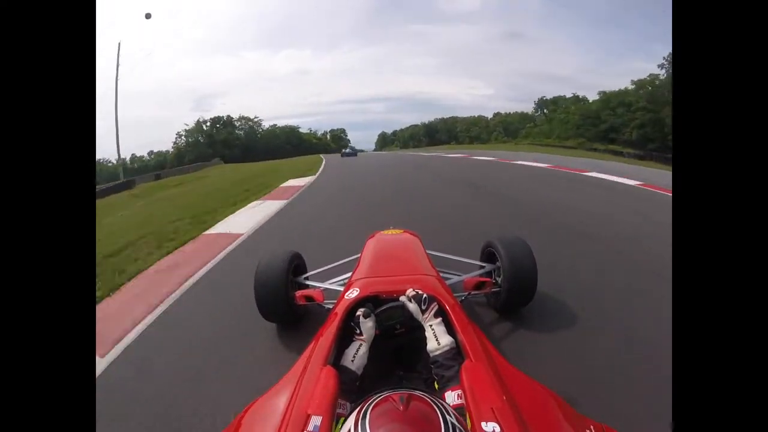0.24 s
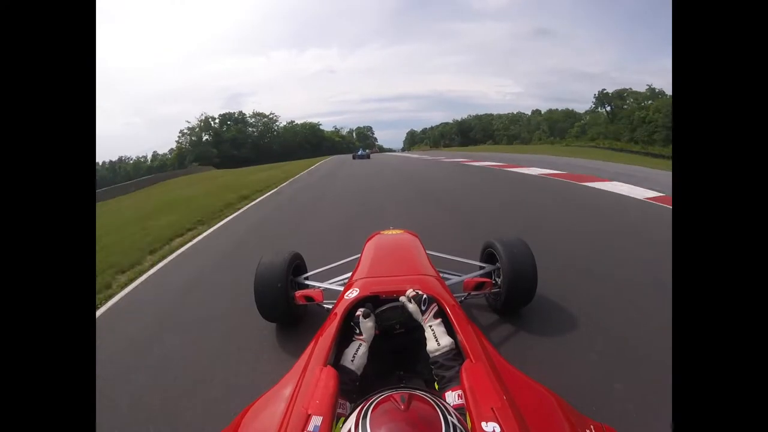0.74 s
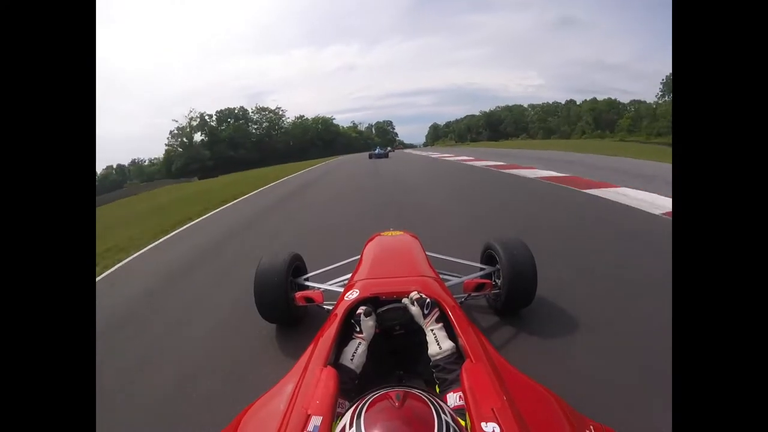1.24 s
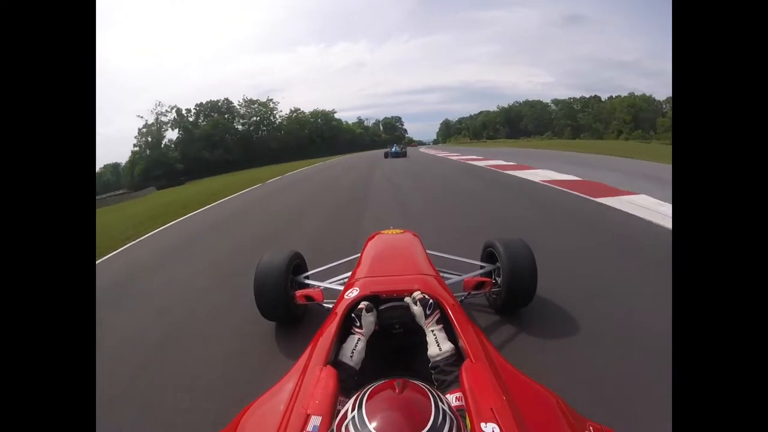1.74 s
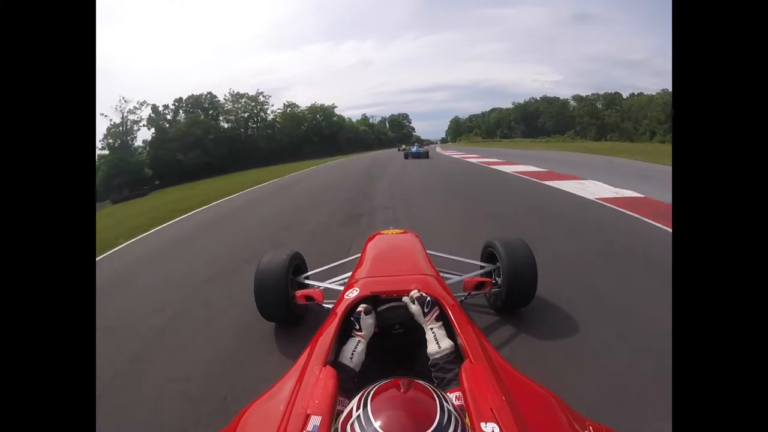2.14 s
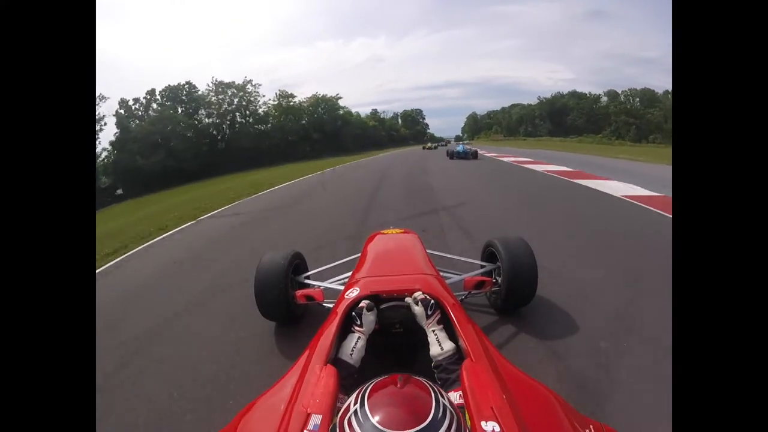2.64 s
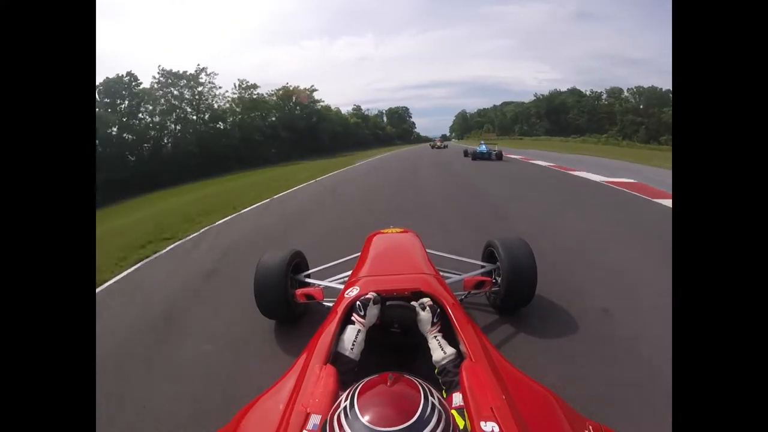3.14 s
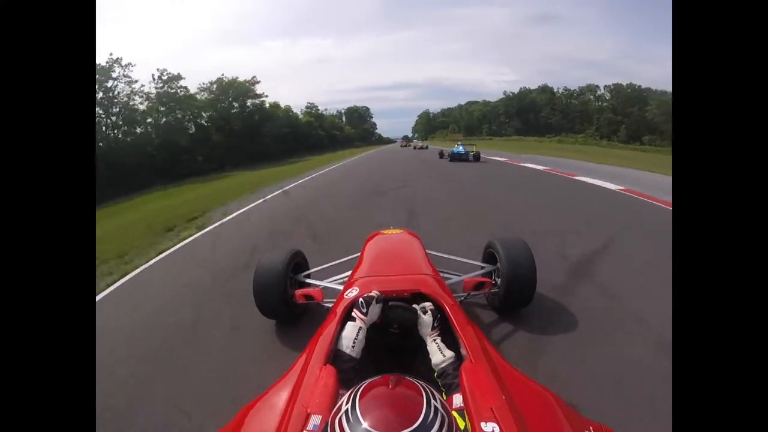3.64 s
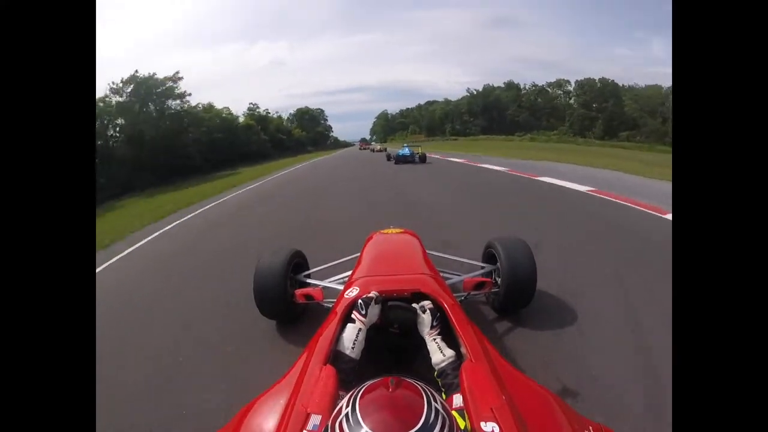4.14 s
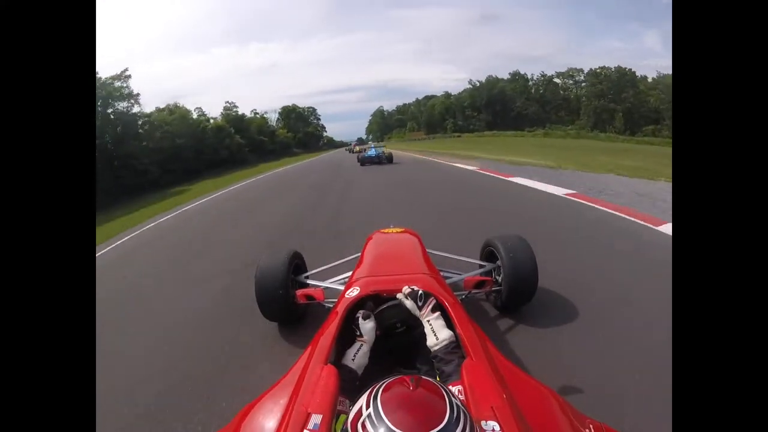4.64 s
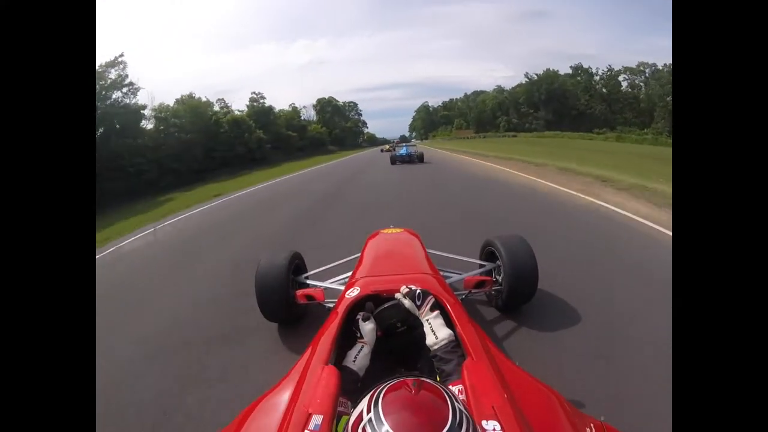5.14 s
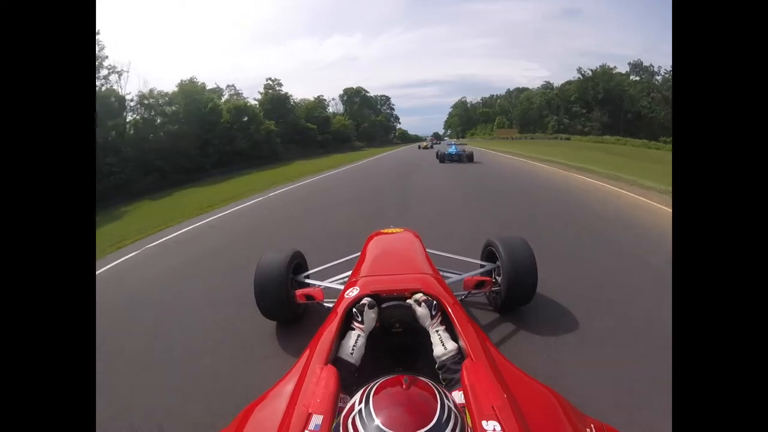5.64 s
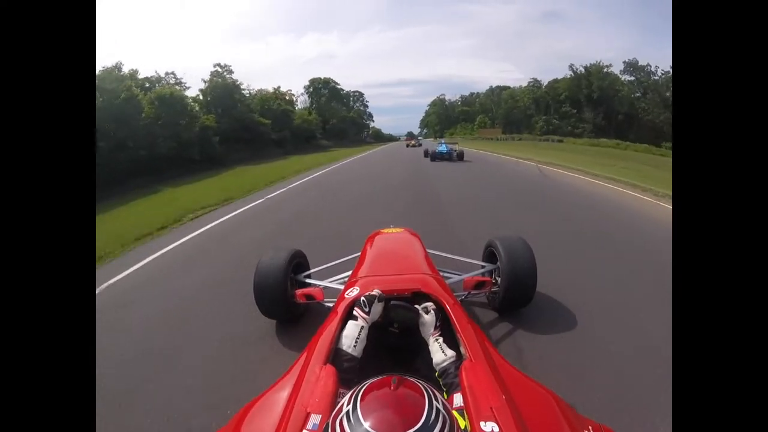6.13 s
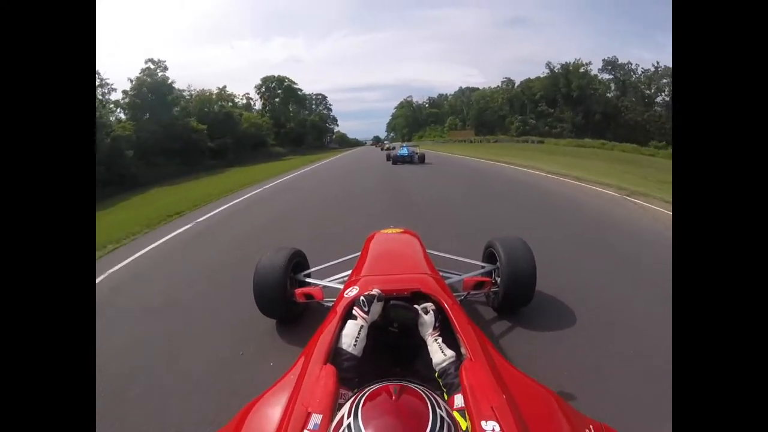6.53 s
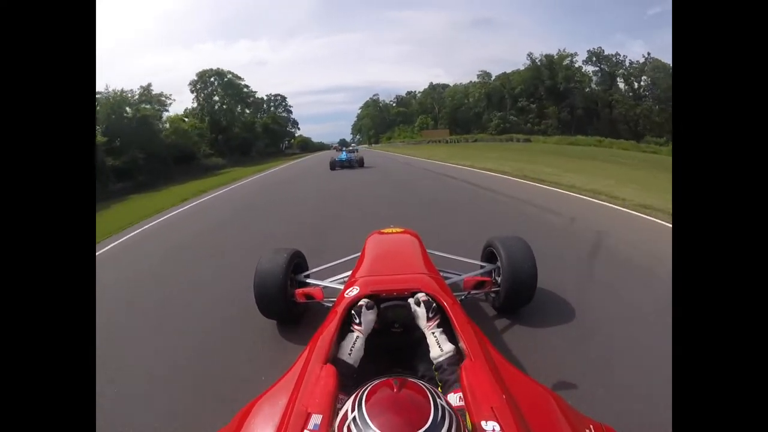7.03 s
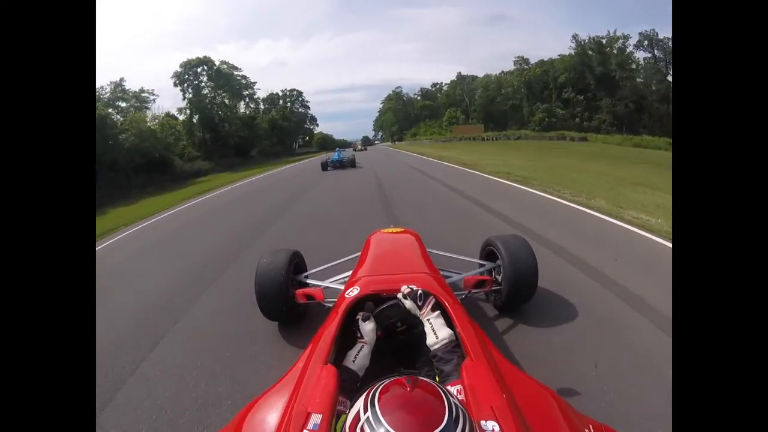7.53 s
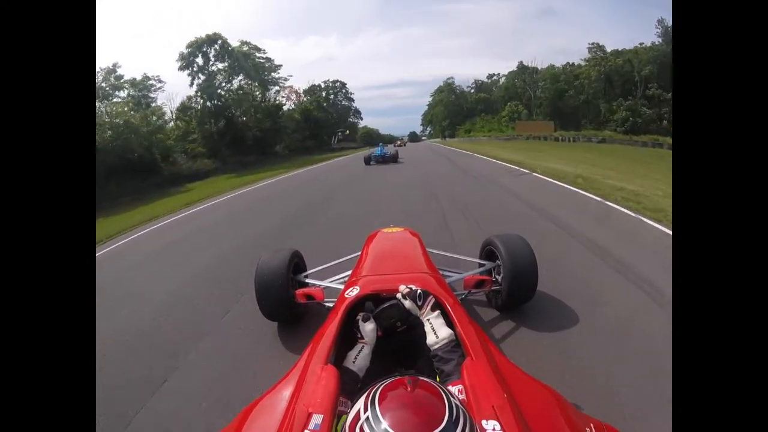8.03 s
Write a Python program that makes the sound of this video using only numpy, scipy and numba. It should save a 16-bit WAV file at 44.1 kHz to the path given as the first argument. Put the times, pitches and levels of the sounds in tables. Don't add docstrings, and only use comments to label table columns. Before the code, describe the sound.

Heard from a sealed microphone just behind a racing driver, a four-cylinder engine pulls hard and raspy, climbing slightly for a second and a half. The throttle snaps shut and the note sinks into a smooth, hollow boom under buffeting wind. Later come a short push of power, a coughing, popping stab and harder pull, then another lift. Small rattles and knocks mark bumps in the road.

```python
import sys
import numpy as np
from scipy import signal
from scipy.fft import rfft, irfft, next_fast_len
from scipy.io import wavfile
from scipy.ndimage import uniform_filter1d
from numba import njit

SR = 44100
rng = np.random.default_rng(int(sys.argv[2]) if len(sys.argv) > 2 else 0)


def pcm_store(signal):
    levels = np.round(np.clip(np.atleast_2d(signal), -1, 1) * 32767)
    wavfile.write(sys.argv[1], SR, levels.astype(np.int16).T)


def natural_amplitude(level_db):
    exponent = np.asarray(level_db, float) / 20
    return 10 ** exponent


N = 365148
TIME_S = np.arange(N) / SR


def level(x, db):
    return x * natural_amplitude(db) / np.sqrt(np.mean(x ** 2))


def columns(table):
    s, *rest = np.transpose(table)
    return [np.interp(TIME_S, s, column) for column in rest]


def on_log(hz, table):
    table_hz, db = np.transpose(table)
    return np.interp(np.log(np.maximum(hz, 1)), np.log(table_hz), db)


def walk(rate):
    hold = int(SR / rate)
    steps = np.repeat(rng.standard_normal(N // hold + 1), hold)
    slewed = uniform_filter1d(uniform_filter1d(steps, hold), hold)[:N]
    return slewed / slewed.std()


def bumps(times, lengths, sizes):
    return sum(h * np.exp(-((TIME_S - s) / w) ** 2) for s, w, h in np.broadcast(times, lengths, sizes))


def since(times):
    return [np.maximum(TIME_S - s, 0) for s in times]


@njit
def svf(x, hz, width):
    y, band, low = np.empty(len(x)), 0., 0.
    for i in range(len(x)):
        g, k = np.tan(np.pi * hz[i] / SR), width / hz[i]
        v = (band + g * (x[i] - low)) / (1 + g * (g + k))
        band, low, y[i] = 2 * v - band, low + 2 * g * v, k * v
    return y


def resonate(x, hz, width_hz):
    return svf(x, np.full(N, float(hz)), float(width_hz))


LOW_REV_HZ, HIGH_REV_HZ = 200, 300

# time_s, firing_rate_hz
REVS_ON_ROAD = [(0, 291.3), (.73, 302.4), (1.46, 312.6), (1.49, 297), (1.7, 302), (2.12, 291.8),
                (2.45, 275.5), (2.9, 255.8), (3.15, 242.3), (3.6, 222.4), (4.3, 211.3), (4.85, 204.4),
                (5.25, 202.8), (5.6, 199.5), (6.22, 193.4), (6.62, 198.6), (7.1, 200.8), (8.28, 184.3)]


def road_speed():
    return columns(REVS_ON_ROAD)[0]


def wheel_shake(speed_hz):
    firings_per_turn, rough_from_s, rough_db = 13, 6.5, 1.5
    shake = level(svf(walk(40), speed_hz / firings_per_turn, 4.), 0)
    roughness = np.clip(TIME_S - rough_from_s, 0, .5) * 2
    return shake * natural_amplitude(rough_db * roughness)


# start_s, swing_hz
DRIVELINE_SHUNTS = [
    (1.49, -14),
    (4.945, 11.5),
    (5.007, 26),
    (5.187, 11),
    (5.332, -26),
    (6.31, 30),
    (6.498, -8.5),
    (7.182, -12.5),
]


def revs(speed_hz, wheel):
    ring_hz, decay_s, wobble_hz = 6.9, .09, .7
    times, swings_hz = np.transpose(DRIVELINE_SHUNTS)
    ring = sum(swing * np.exp(-q / decay_s) * np.sin(2 * np.pi * ring_hz * q)
               for q, swing in zip(since(times), swings_hz))
    wobble = np.gradient(wheel)
    return speed_hz + ring + wobble_hz * wobble / wobble.std()


# time_s, opening_0_to_1
THROTTLE_PEDAL = [(0, 0.74), (.35, 0.82), (.7, 0.75), (1.3, 0.47), (1.455, 0.5), (1.475, 0.02),
                  (4.76, 0.02), (4.85, 0.3), (5.2, 0.48), (5.28, 0.23), (5.33, 0.07), (6.18, 0.12),
                  (6.24, 0.51), (6.58, 0.6), (6.88, 0.71), (6.94, 0.35), (7.07, 0.44), (7.13, 0.15)]
# firing_rate_hz, level_db
OVERRUN_SECOND_ORDER = [(187, -39.5), (194, -32.5), (204, -43), (214, -37), (228, -45.5), (254, -38.5),
                        (290, -48), (305, -47)]
# firing_rate_hz, level_db
OVERRUN_THIRD_ORDER = [(189, -51), (195, -55.5), (205, -52), (213, -46.5), (224, -54.5), (240, -64.5)]
PULLING_SECOND_ORDER = [-45.5, -31]
# start_s, length_s, extra_uneven_db, sharpening_db_per_order
STAB_MISFIRES = [
    (6.262, 0.009, 6, 0),
    (6.314, 0.03, 10, 0),
    (6.36, .022, 11, 0),
    (6.414, 0.03, 7, 0),
]


def throttle(speed_hz):
    bite = .3
    pull_db, load_db = -41.5, 7
    pedal = columns(THROTTLE_PEDAL)[0]
    pull = np.clip(pedal / bite, 0, 1)
    load = np.maximum(pedal - bite, 0) / (1 - bite)
    shut_db = on_log(speed_hz, OVERRUN_SECOND_ORDER) + 2.5 * walk(25)
    pulling_db = np.interp(speed_hz, [LOW_REV_HZ, HIGH_REV_HZ], PULLING_SECOND_ORDER)
    second_db = shut_db + pull * (pulling_db - shut_db)
    shut_db = on_log(speed_hz, OVERRUN_THIRD_ORDER) + 4 * walk(25)
    pulse_db = shut_db + pull * (pull_db - shut_db) + load_db * load
    stages = [0, bite, 1]
    s, length, extra_db, sharp_db = np.transpose(STAB_MISFIRES)
    dull_db = np.interp(pedal, stages, [8, 3.6, -1.6]) - bumps(s, length, sharp_db)
    uneven_db = np.interp(pedal, stages, [-63, -59, -47.5]) + bumps(s, length, extra_db)
    return second_db, pulse_db, dull_db, uneven_db


# firing_rate_hz, level_db
MOUNT_RESPONSE = [(195, -20.5), (230, -18), (246, -21.5), (268, -22.5), (284, -40), (290, -28),
                  (298, -29.5), (311, -40)]
# time_s, boom_change_db
MOUNT_JOLTS = [(1.545, -7.0), (1.62, 4.0), (1.66, -9.0), (2.877, -2.6), (2.919, 3.1), (2.954, -4.3),
               (3.029, -2.2), (3.108, -3.2), (4.181, -2.2), (4.641, 2.2), (4.758, -1.9), (4.827, -2.9),
               (4.946, 1.8), (5.066, -3.9), (5.128, 3.3), (5.162, -1.7), (5.369, 2.0), (5.425, 3.1),
               (5.479, -1.8), (5.507, -2.9), (5.601, 2.0), (5.635, -3.0), (5.99, -1.7), (6.232, 2.0),
               (6.29, 3.2), (6.332, -2.7), (6.348, 3.5), (6.365, -8.5), (6.389, 3.2), (6.437, 2.4),
               (6.469, 1.7), (6.514, -3.0), (6.557, 1.8), (6.648, -2.3), (6.738, 1.7), (6.767, -3.3),
               (6.796, 2.0), (6.927, -2.6), (6.952, 2.8), (7.007, 2.3), (7.042, -3.3), (7.135, -1.9),
               (7.21, -1.8), (7.291, 4.1), (7.321, -3.3), (7.365, -4.4), (7.391, 2.6), (7.549, -1.9),
               (7.593, -2.1), (7.619, 2.6), (7.668, -2.1), (7.703, 2.3), (7.796, 2.8), (7.904, -3.0),
               (7.945, 2.8), (7.991, -2.7), (8.03, 1.9), (8.075, -3.0), (8.098, 1.8), (8.182, 1.8)]


def mount_boom(phase, speed_hz, wheel):
    times, changes_db = np.transpose(MOUNT_JOLTS)
    boom_db = on_log(speed_hz, MOUNT_RESPONSE) + bumps(times, .012, changes_db) + .3 * wheel
    flutter_db = 0.083 * walk(50) + 0.66 * walk(110)
    return natural_amplitude(boom_db + flutter_db) * np.cos(phase + 0.077 * walk(40))


# firing_order, high_revs_db, low_revs_db
PULSE_ORDERS = [(.75, -8, -10), (1.25, -12, -7), (1.5, -12, -9), (2.75, -12, -13), (3, 1, 0),
                (3.25, -8, -18), (3.5, -7, -20), (4, -4, -6), (4.5, -16, -15), (4.75, -13, -12),
                (5, -5, -14), (5.25, -18, -16), (5.5, -16, -16), (5.75, -16, -22), (6, -11, -16),
                (6.25, -13, -23), (6.5, -20, -26), (6.75, -18, -24), (7, -14, -13), (7.25, -19, -28),
                (7.5, -23, -26), (7.75, -22, -30), (8, -18, -16), (8.25, -18, -30), (8.5, -18, -26),
                (8.75, -19, -26), (9, -23, -28), (9.25, -19, -27), (9.5, -23, -29), (9.75, -22, -34),
                (10, -23, -22), (10.25, -23, -34), (10.5, -23, -34), (11.25, -27, -38), (11.75, -26, -38),
                (12.25, -26, -38), (12.75, -27, -38), (14.25, -23, -40), (14.75, -23, -40),
                (15.25, -23, -40), (15.75, -22, -40), (16, -21, -40), (16.25, -22, -40), (16.5, -23, -40)]
CYLINDER_CRACK = [.2, -.15, .45, -.35]


def exhaust_pulse(phase, hz, dull_db):
    high = np.clip((hz - LOW_REV_HZ) / (HIGH_REV_HZ - LOW_REV_HZ), 0, 1)
    cylinder = np.arange(len(CYLINDER_CRACK))
    out = 0
    for order, high_db, low_db in PULSE_ORDERS:
        db = low_db + high * (high_db - low_db) + 1.1 * walk(25)
        db = db - dull_db * min(abs(order - 3), 4)
        pattern = np.angle(CYLINDER_CRACK @ np.exp(-2j * np.pi * order * cylinder))
        offset = pattern if order % 1 > 0 else 0
        out = out + natural_amplitude(db) * np.cos(order * phase + offset)
    return out


CYLINDER_STRENGTH = [0.21, 0.77, -0.6, -0.52]


def unevenness(turns, scatter):
    count = int(turns[-1]) - 1
    at = np.interp(np.arange(count) + 1, turns, np.arange(N))
    size = np.resize(CYLINDER_STRENGTH, count) + scatter * rng.standard_normal(3000)[:count]
    pulses = np.zeros(N + 1)
    np.add.at(pulses, at.astype(int), size * (1 - at % 1))
    np.add.at(pulses, at.astype(int) + 1, size * (at % 1))
    return pulses[:N]


# centre_hz, width_hz, level_db
PIPE_MODES = [(250, 110, -3), (965, 140, 18), (1450, 380, -9.5), (1850, 360, -13)]


def pipe_ring(turns):
    drive = unevenness(turns, scatter=.4)
    out = 0
    for hz, width_hz, db in PIPE_MODES:
        once = resonate(drive, hz, 1.7 * width_hz)
        out = out + natural_amplitude(db) * resonate(once, hz, 1.7 * width_hz)
    return level(out, 0)


def gas_rasp(turns):
    gas = np.exp(-(turns % 1) / 0.26) * rng.standard_normal(N)
    rasp = level(resonate(gas, 4800, 350), -7)
    puff = level(resonate(gas, 2400, 2500), -21)
    shaking = np.exp(1.5 * np.cos(np.pi / 2 * (turns - 2))) * rng.standard_normal(N)
    return rasp + puff + level(resonate(shaking, 6600, 1400), -4)


def engine():
    speed_hz = road_speed()
    wheel = wheel_shake(speed_hz)
    hz = revs(speed_hz, wheel)
    second_db, pulse_db, dull_db, uneven_db = throttle(speed_hz)
    turns = np.cumsum(hz) / SR
    phase = 2 * np.pi * turns
    boom = mount_boom(phase, speed_hz, wheel)
    second = natural_amplitude(second_db + .6 * walk(20)) * np.cos(2 * phase - .3 + 0.3 * walk(30))
    pulse = natural_amplitude(pulse_db) * exhaust_pulse(phase + .015 * walk(60), hz, dull_db)
    rasp = (hz / HIGH_REV_HZ) ** 7 * gas_rasp(turns)
    return np.sqrt(2) * (boom + second + pulse) + natural_amplitude(uneven_db) * (pipe_ring(turns) + rasp)


# time_s, buffeting_db, buzz_db
WIND_AND_BUZZ = [(0, -36, -43.5), (.64, -35, -45), (1.06, -35.5, -50), (1.45, -33, -50.5),
                 (2.1, -32, -55.5), (2.3, -36, -54), (2.9, -36.5, -58), (3.55, -39.5, -64),
                 (3.85, -42, -65.5), (4.6, -40, -61.5), (5.05, -43, -55.5), (5.35, -40.5, -59),
                 (5.8, -39, -56), (6.1, -39.5, -61.5), (6.7, -48, -62), (7.15, -40, -64.5),
                 (8.1, -36.5, -66.5), (8.28, -33.5, -63.5)]
# time_s, length_s, change_db
GUSTS_AND_LULLS = [(0.65, 0.057, 3), (0.774, .04, -4.5), (1.178, 0.06, -8.5), (1.256, 0.03, 2),
                   (1.522, .025, 8), (1.593, .035, 7), (1.665, 0.037, -1), (1.87, 0.052, 3.5),
                   (2.186, 0.037, -4.5), (3.813, .05, -6), (3.958, .05, -1), (4.77, 0.024, -6),
                   (5.042, 0.067, 4), (5.53, .05, 5.5), (5.632, .03, -1.5), (5.805, .04, 3),
                   (6.169, 0.044, 3.5), (8.19, 0.023, -8.5)]


def airflow():
    full_roar_hz = 258.7
    buffet_db, buzz_db = columns(WIND_AND_BUZZ)
    buffet_db = buffet_db + bumps(*np.transpose(GUSTS_AND_LULLS))
    octaves = np.minimum(np.log2(road_speed() / full_roar_hz), 0)
    buffet_swing_db = buffet_db - buffet_db.mean()
    buzz_swing_db = buzz_db - buzz_db.mean()
    rumble_db = -42.5 + 10 * octaves + 0.16 * buffet_swing_db + 0.033 * buzz_swing_db + 0.99 * walk(16)
    roar_db = -48.5 + 23 * octaves + 0.035 * buffet_swing_db + 0.082 * buzz_swing_db + 0.59 * walk(21)
    return np.array([buffet_db, rumble_db, roar_db, buzz_db + 0.65 * walk(13)])


# centre_hz, third_octave_db
WIND_TINT = [(20, -17), (32, -16.5), (60, -7.5), (125, -9), (200, -0.5), (320, -6), (500, -1), (700, -3),
             (1000, -4), (1500, -4.5), (2500, -3.5), (4000, -4.5), (8000, -1), (12000, 5)]
AIRFLOW_CENTRES = [110, 480, 2300, 5500]


def wind():
    size = next_fast_len(N)
    f = np.arange(size // 2 + 1) * SR / size
    white = rfft(rng.standard_normal(size))
    curves = airflow()
    gust, shake = walk(7), walk(30)
    grain = .6 * walk(250)
    anchors = np.arange(len(curves))
    out = 0
    for hz in 20 * 2 ** np.arange(0, 9.4, 1 / 3):
        thirds_away = np.clip(3 * np.log2(np.maximum(f, 1) / hz), -1, 1)
        band = irfft(white * np.cos(np.pi / 2 * thirds_away), size)[:N]
        place = np.interp(np.log(hz), np.log(AIRFLOW_CENTRES), anchors)
        share = np.maximum(1 - abs(place - anchors), 0)
        swell_db = share[0] * gust + (1 - share[0]) * (0.55 * shake + grain)
        db = share @ curves + on_log(hz, WIND_TINT) + swell_db + 0.72 * walk(12)
        out = out + natural_amplitude(db) * level(band, 0)
    return out


# start_s, level_db, length_s
LOOSE_RATTLES = [(0.656, -56, 0.0053), (1.04, -55, .006), (2.512, -70, .006), (2.92, -54, .002),
                 (2.927, -55, .002), (3.933, -60, 0.029), (4.464, -57, 0.011), (5.004, -56, .025),
                 (5.048, -53.5, .015), (5.11, -59, 0.05), (5.159, -60, .04), (5.5, -57.5, .06),
                 (5.649, -60.5, 0.029), (6.317, -69, 0.026), (7.308, -74, 0.0074), (7.687, -68, .008),
                 (8.0, -64.5, 0.013), (8.099, -60, 0.013)]


def rattles():
    burst = sum(natural_amplitude(db) * (TIME_S > s) * np.exp(-abs(TIME_S - s) / length) for s, db, length in LOOSE_RATTLES)
    clicks = rng.standard_normal(N) * natural_amplitude(1.1 * rng.exponential(size=N))
    return burst * level(resonate(clicks, 4000, 6000), 11)


# time_s, length_s, signed_size
MOUNT_KNOCKS = [
    (.851, .002, -.09),
    (1.055, .0011, .12),
    (2.514, .0008, .05),
]


def knocks():
    return bumps(*np.transpose(MOUNT_KNOCKS))


# start_s, peak_db, ring_hz
RINGING_POPS = [(2.514, -28, 700), (2.925, -28, 530), (2.932, -29, 530), (6.239, -35, 888),
                (6.254, -34, 999), (6.266, -26.5, 886), (6.286, -34, 944), (6.298, -32, 1060),
                (6.316, -27.5, 900), (6.326, -32, 900), (6.335, -26, 960), (6.345, -31, 958.5),
                (6.353, -28, 935), (6.363, -30, 950), (6.372, -32, 990), (6.403, -36, 999),
                (6.415, -31, 945), (6.43, -32, 960), (7.311, -33, 520), (7.686, -34, 520)]


def pops():
    decay_s, gain_db, overtone, overtone_db = .0035, 2, 1.55, -12
    out = 0
    for s, db, hz in RINGING_POPS:
        q = np.maximum(TIME_S - s, 0)
        ring = np.sin(2 * np.pi * hz * q) + natural_amplitude(overtone_db) * np.sin(2 * np.pi * overtone * hz * q)
        out = out + natural_amplitude(db + gain_db) * np.exp(-q / decay_s) * ring
    return out


# time_s, peak_db
GRIT_TICKS = [
    (2.9215, -56),
    (2.9285, -54),
    (3.3822, -62),
    (3.5174, -59),
    (4.2914, -63),
    (6.2924, -63),
    (8.0985, -62),
]


def ticks():
    s, db = np.transpose(GRIT_TICKS)
    hits = np.zeros(N)
    hits[(s * SR).astype(int)] = natural_amplitude(db + 44)
    return resonate(hits, 9000, 6000)


def scene():
    return (engine() + wind() + rattles() + knocks() + pops() + ticks())[None]


# frequency_hz, gain_db
CASE_RESPONSE = [(20, 0), (2600, -2.5), (3600, -3.5), (4300, -4), (4800, -3.5), (5500, -9), (6050, -20.5),
                 (6500, -3.5), (7000, -17), (8000, -21), (9100, -33), (10000, -41.5), (12000, -53.5),
                 (22050, -70)]


def low_pass(x):
    return signal.sosfilt(signal.butter(12, 11860, fs=SR, output="sos"), x)


def record(dry):
    size = next_fast_len(N + SR)
    f = np.arange(size // 2 + 1) * SR / size
    cased = irfft(rfft(dry, size) * natural_amplitude(on_log(f, CASE_RESPONSE)), size)[:, :N]
    return low_pass(np.tanh(1.518 * cased) / 1.508)


dry = scene()
out = record(dry)
pcm_store(out)
```